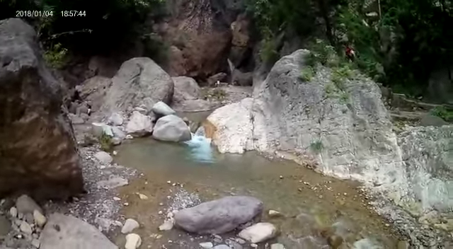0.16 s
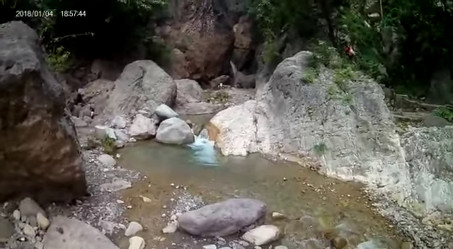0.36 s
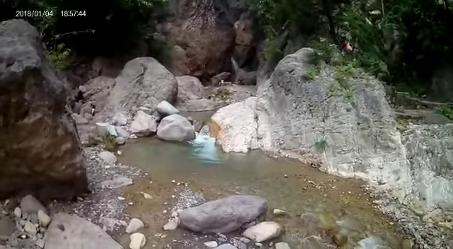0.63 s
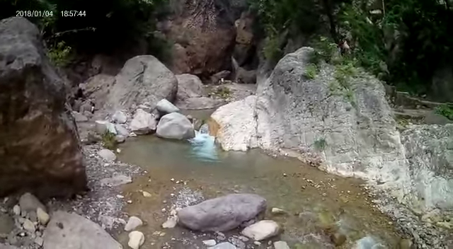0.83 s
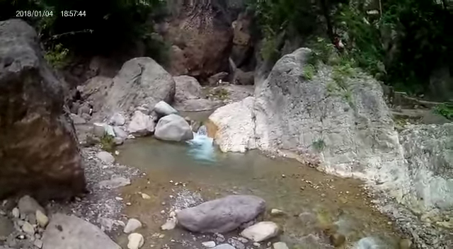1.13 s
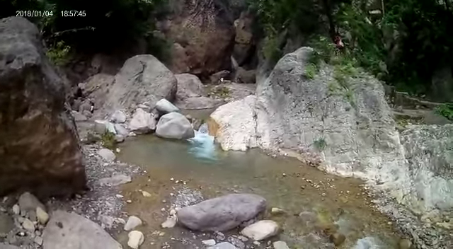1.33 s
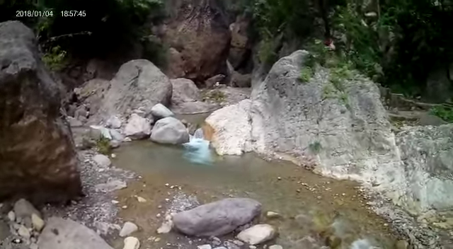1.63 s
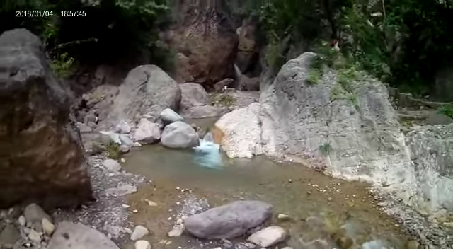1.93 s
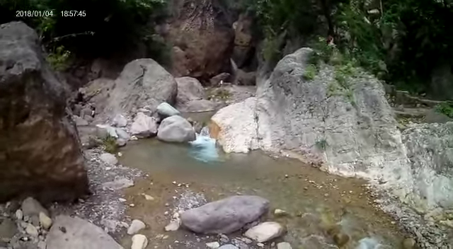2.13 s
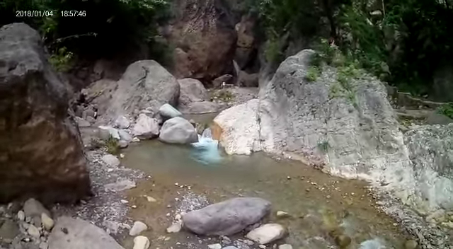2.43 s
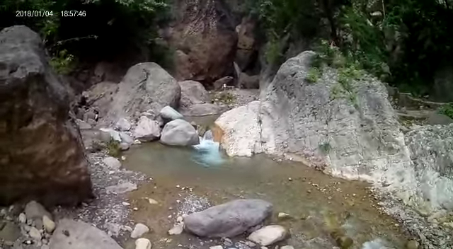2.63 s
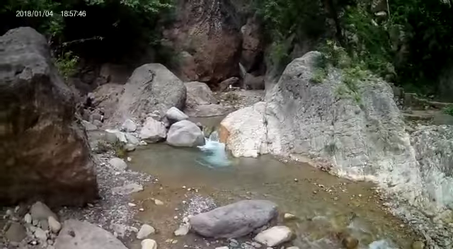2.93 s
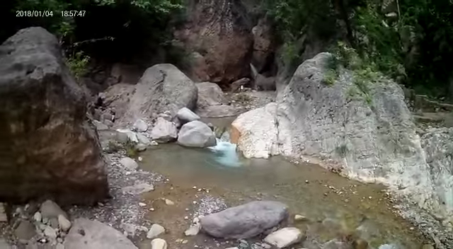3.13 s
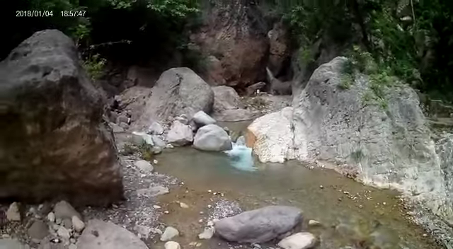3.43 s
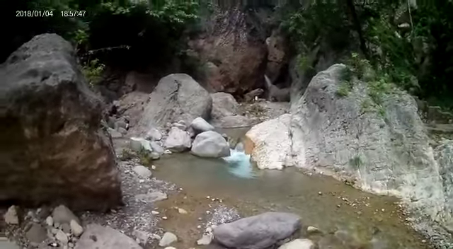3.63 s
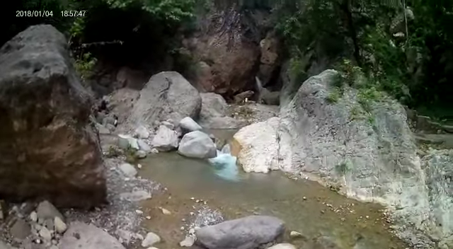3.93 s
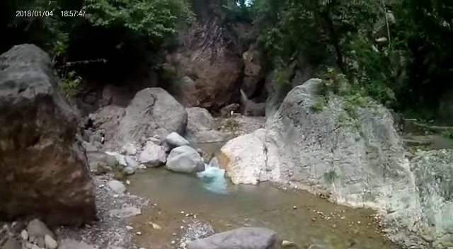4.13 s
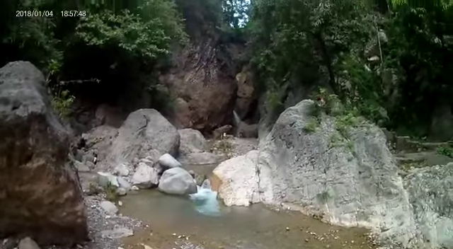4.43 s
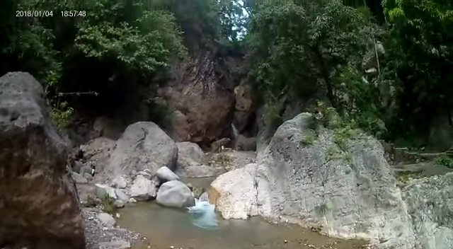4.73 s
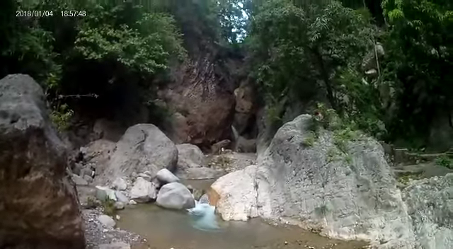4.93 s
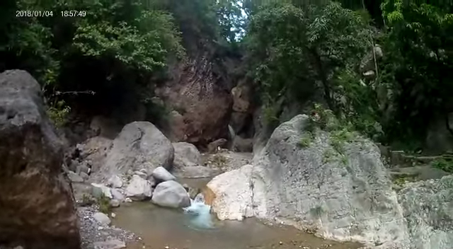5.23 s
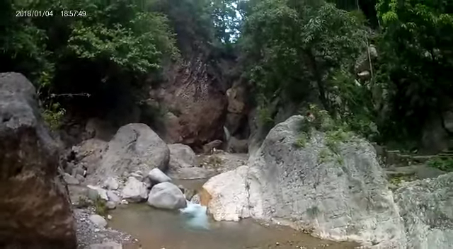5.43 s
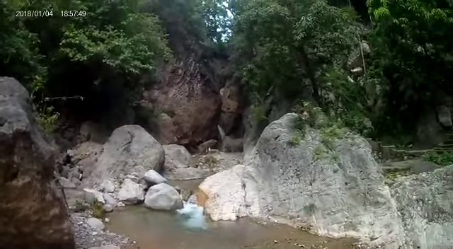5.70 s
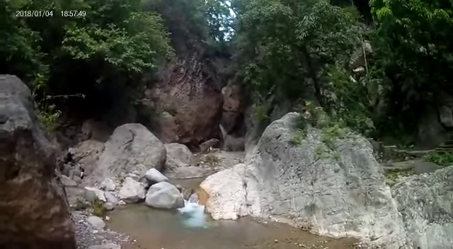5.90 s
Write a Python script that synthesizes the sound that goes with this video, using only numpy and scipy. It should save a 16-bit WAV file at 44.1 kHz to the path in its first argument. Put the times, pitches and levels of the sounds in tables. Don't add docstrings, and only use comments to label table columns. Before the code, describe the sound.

Muffled, steady stream rush with occasional bubble glugs; four very loud plastic snaps close to the microphone, three preceded by faint handling taps and clicks.

```python
import sys
import numpy as np
from scipy import signal
from scipy.fft import rfft, irfft, next_fast_len
from scipy.io import wavfile
from scipy.ndimage import uniform_filter1d, map_coordinates

SR = 44100
rng = np.random.default_rng(int(sys.argv[2]) if len(sys.argv) > 2 else 0)


def volts_from_decibels(level):
    exponent = np.asarray(level, float) / 20
    return 10 ** exponent


def output_pcm(signal):
    pcm = np.clip(np.atleast_2d(signal).T, -1, 1) * 32767
    wavfile.write(sys.argv[1], SR, np.round(pcm).astype(np.int16))


N = 267187


def unit(x):
    return x / np.sqrt(np.mean(x ** 2) + 1e-20)


def along(points, hz):
    f, v = np.transpose(points)
    return np.interp(np.log(hz + 1), np.log(f + 1), v)


def filtered(x, response):
    m = next_fast_len(N + 8192)
    return irfft(rfft(x, m) * response(np.fft.rfftfreq(m, 1 / SR)), m)[:N]


def shaped_noise(x, spectrum):
    return unit(filtered(x, lambda f: volts_from_decibels(along(spectrum, f))))


def wobble(rate):
    return map_coordinates(rng.standard_normal(N // 1000 + 4), [np.arange(N) * rate / SR])


def blurred(shape, bins, frames):
    field = uniform_filter1d(rng.standard_normal(shape), size=bins, axis=0)
    return unit(uniform_filter1d(field, size=frames, axis=1))


def patchy(depth_db):
    z = signal.stft(rng.standard_normal(N + 512), nperseg=512)[2]
    gain = volts_from_decibels(depth_db * blurred(z.shape, bins=5, frames=8))
    return signal.istft(z * gain, nperseg=512)[1][:N]


def add(track, s, sound):
    part = track[max(round(s * SR), 0):][:len(sound)]
    part += sound[:len(part)]


def bubble(t, hz, cycles):
    life = t * hz / cycles
    tone = np.sin(2 * np.pi * hz * t * (1 + .06 * life))
    return tone * np.exp(-life) * (1 - np.exp(-6 * life))


def froth(count, hz, cycles, spread_db):
    when, pitch, size = rng.random(count), rng.standard_normal(count), rng.exponential(size=count)
    step = np.arange(500)
    pitches = hz * np.exp(.6 * pitch)[:, None]
    grains = volts_from_decibels(spread_db * size)[:, None] * bubble(step / SR, pitches, cycles)
    places = (when * N).astype(int)[:, None] + step
    return unit(np.bincount(places.ravel(), grains.ravel())[:N])


def ring(modes, t, contact):
    on = np.maximum(t, 0)
    tones = 0
    for hz, db, t60 in modes:
        decay = volts_from_decibels(db + rng.normal(0, 1) - 60 * on / t60)
        tones = tones + decay * np.sin(2 * np.pi * hz * on)
    return tones * (1 - np.exp(-on / contact))


def contacts(rows, air, parts):
    sign, hz, lag, rise, fall, jerk_db, width, contact = air
    lead = .02
    out, t = np.zeros(N), np.arange(SR // 6) / SR - lead
    late = t - lag
    swell = np.where(late < 0, np.exp(-(late / rise) ** 2), np.exp(-late / fall))
    slowing = late / (1 + 30 * np.abs(late))
    jerk = volts_from_decibels(jerk_db) * np.exp(-(t / width) ** 2)
    squeeze = swell * np.cos(2 * np.pi * hz * slowing) - jerk
    for s, air_db, *part_db in rows:
        shake = sum(volts_from_decibels(db) * ring(part, t, contact) for db, part in zip(part_db, parts))
        add(out, s - lead, sign * (volts_from_decibels(air_db) * squeeze - shake))
    return out


def levels(rows, follow):
    s, hard_db, lean_db = np.transpose(rows)
    air, lid, chink = [db + gain * (hard_db - hard_db.mean()) for db, gain in follow]
    chink = chink + .6 * lean_db
    return np.transpose([s, air, lid, hard_db - lean_db, hard_db + lean_db, chink])


# (frequency [Hz], density [dB per Hz])
ROAR_SPECTRUM = [(70, -40), (120, -11), (162, -13), (214, -7.5), (560, -6.5), (780, -8), (1110, -3),
                 (1240, -4), (1430, .8), (1750, -4), (2100, -12.5), (2550, -22), (3200, -42), (6000, -120)]
# (frequency [Hz], density [dB per Hz])
SPRAY_SPECTRUM = [(2000, -30), (2750, -12), (3050, -6), (3520, -8), (4130, 1.5), (4330, -4), (4500, -3),
                  (4750, -11), (5350, -15), (6050, -18), (6270, -25), (6500, -19), (7150, -19), (8000, -46)]
# (frequency [Hz], width [Hz], depth [0-1])
SHELL_NOTCH = (1225, 45, .55)
ROAR_DB, SPRAY_DB = -48.9, -60.7


def waterfall():
    hz, width, depth = SHELL_NOTCH

    def through(f):
        notch = 1 - depth / (1 + ((f - hz) / width) ** 4)
        return volts_from_decibels(along(ROAR_SPECTRUM, f)) * notch

    bubbles = froth(count=3500, hz=1100, cycles=3, spread_db=1.6)
    roar = unit(filtered(unit(patchy(depth_db=.7)) + .22 * bubbles, through))
    spray = shaped_noise(patchy(depth_db=.9), SPRAY_SPECTRUM)
    surge = wobble(3)
    roar_gain = volts_from_decibels(ROAR_DB + .5 * surge + .6 * wobble(14))
    return roar_gain * roar + volts_from_decibels(SPRAY_DB + .3 * surge) * spray


def effort():
    reach_s, ease_s = .1, .4
    t = np.arange(N) / SR
    starts = [-ease_s] + [row[0] - reach_s for row in PRESS_TIMES]
    held = sum((t > a) & (t < row[0]) for a, row in zip(starts, SNAP_TIMES))
    return uniform_filter1d(held * 1., size=round(ease_s * SR))


# (frequency [Hz], density [dB per Hz])
GRIP_SPECTRUM = [(8, -20), (15, 0), (43, -2), (70, 0), (135, -7), (220, -18), (400, -120)]
GRIP_DB, SQUEEZE_DB = -62.5, 8


def hand_rumble():
    noise = shaped_noise(rng.standard_normal(N), GRIP_SPECTRUM)
    grip = unit(volts_from_decibels(3 * wobble(9)) * noise)
    return volts_from_decibels(GRIP_DB + SQUEEZE_DB * effort()) * grip


# (time [s], hardness [dB], lean from shell toward tick [dB])
SNAP_TIMES = [
    (.0268, 5.2, 1),
    (2.0612, -2.7, 4.2),
    (4.1378, 4, -3),
    (5.7112, 4, 4),
]
# (sign, frequency [Hz], peak after contact [s], rise [s], fall [s],
# jerk [dB], jerk width [s], contact time [s])
SNAP_THUMP = (1, 90, .002, .0018, .006, 1.5, .0012, .001)
# (level at usual hardness [dB], gain per dB of hardness [dB])
SNAP_COUPLING = [(-8, .02), (-3.4, .15), (-3.5, .25)]
# (frequency [Hz], level [dB], t60 [s])
LID_MODES = [(650, 0, .025), (800, -1.5, .017)]
# (frequency [Hz], level [dB], t60 [s])
SHELL_MODES = [(1370, 0, .016), (1600, 0, .012)]
# (frequency [Hz], level [dB], t60 [s])
TICK_MODES = [(2130, 4, .012), (2620, -1, .010)]
# (frequency [Hz], level [dB], t60 [s])
DOOR_MODES = [(1130, -8, .026), (1077, -38, .15)]
# (frequency [Hz], level [dB], t60 [s])
PIN_MODES = [(3545, -25, .03), (3528, -44, .12)]
# (frequency [Hz], level [dB], t60 [s])
CHINK_MODES = [(3530, -8, .008), (4080, 1, .009), (4550, -3, .008), (5420, -5, .008)]
# (frequency [Hz], level [dB], t60 [s])
GLINT_MODES = [(6280, -8, .008), (9500, -27, .004), (13000, -28, .004)]


def snaps():
    parts = (LID_MODES, SHELL_MODES, TICK_MODES + DOOR_MODES + PIN_MODES, CHINK_MODES + GLINT_MODES)
    return contacts(levels(SNAP_TIMES, SNAP_COUPLING), SNAP_THUMP, parts)


# (time [s], air [dB], lid [dB], shell [dB], tick [dB])
TOUCH_TIMES = [
    (.1905, -47, -42, -38, -31),
    (1.107, -40, -52, -60, -60),
    (1.486, -38, -60, -60, -60),
    (1.627, -50, -50, -42, -40),
    (3.687, -32, -40, -50, -60),
    (3.8683, -56, -37, -35, -41),
    (3.897, -58, -56, -48, -47),
    (5.313, -52, -34, -52, -60),
]
# (sign, frequency [Hz], peak after contact [s], rise [s], fall [s],
# jerk [dB], jerk width [s], contact time [s])
PRESS_THUMP = (-1, 72, .0025, .005, .011, -20, .0003, .00025)
# (frequency [Hz], level [dB], t60 [s])
FINGER_MODES = [(330, -4, .014), (650, -1, .02), (820, -3, .015)]
# (frequency [Hz], level [dB], t60 [s])
PAD_TICK_MODES = [(2250, 7, .007)]


def touches():
    return contacts(TOUCH_TIMES, PRESS_THUMP, (FINGER_MODES, SHELL_MODES, PAD_TICK_MODES))


# (time [s], peak level [dB], frequency [Hz])
GLUG_TIMES = [
    (.83, -47, 700),
    (1.779, -35, 1490),
    (3.037, -38, 1020),
    (3.122, -45, 650),
    (3.366, -43, 622),
    (4.892, -44, 1100),
]


def glugs():
    out, t = np.zeros(N), np.arange(SR // 10) / SR
    for s, db, hz in GLUG_TIMES:
        add(out, s, volts_from_decibels(db + 1.5) * bubble(t, hz, cycles=9))
    return out


# (time [s], hardness [dB], lean from shell toward tick [dB])
PRESS_TIMES = [
    (1.6334, -30.5, 5),
    (3.7465, -18.5, 3),
    (5.2597, -21, 4),
]
# (frequency [Hz], level [dB], t60 [s])
GRIT_MODES = [(8600, -34, .006), (9800, -33, .006), (11000, -32, .006), (12200, -33, .006),
              (13600, -33, .006)]


def scrapes():
    rows = [(row[0] - .006, -np.inf, -17) for row in PRESS_TIMES]
    return contacts(rows, PRESS_THUMP, (GRIT_MODES,))


# (level at usual hardness [dB], gain per dB of hardness [dB])
PRESS_COUPLING = [(-20.5, .82), (-31, 1.5), (-20.5, 1.95)]
# (frequency [Hz], level [dB], t60 [s])
PAD_CHINK_MODES = [(3980, 2.5, .006), (5420, -12, .007)]


def presses():
    parts = (FINGER_MODES, SHELL_MODES, PAD_TICK_MODES, PAD_CHINK_MODES)
    return contacts(levels(PRESS_TIMES, PRESS_COUPLING), PRESS_THUMP, parts)


# (time [s], hardness [dB], lean from shell toward tick [dB])
SEAT_TIMES = [
    (1.7311, -32, 1.5),
    (3.7851, -27, -4),
    (5.3315, -25, -.5),
]
# (sign, frequency [Hz], peak after contact [s], rise [s], fall [s],
# jerk [dB], jerk width [s], contact time [s])
SEAT_THUMP = (-1, 90, .0025, .0015, .007, .5, .0005, .0012)
# (level at usual hardness [dB], gain per dB of hardness [dB])
SEAT_COUPLING = [(-29.5, .47), (-14.5, -.4), (-32, .75)]
# (frequency [Hz], level [dB], t60 [s])
HELD_LID_MODES = [(640, -7, .022), (790, 0, .019)]


def seats():
    parts = (HELD_LID_MODES + GRIT_MODES, SHELL_MODES + DOOR_MODES, TICK_MODES, CHINK_MODES)
    return contacts(levels(SEAT_TIMES, SEAT_COUPLING), SEAT_THUMP, parts)


# (time [s], hardness [dB], lean from shell toward tick [dB])
UNSEAT_TIMES = [
    (1.9643, -33, -5),
    (4.0137, -46, .1),
    (5.5899, -52, .1),
]
# (sign, frequency [Hz], peak after contact [s], rise [s], fall [s],
# jerk [dB], jerk width [s], contact time [s])
UNSEAT_THUMP = (1, 90, .0025, .0015, .006, .5, .0007, .0022)
# (level at usual hardness [dB], gain per dB of hardness [dB])
UNSEAT_COUPLING = [(-24.3, .13), (-9, .42), (-55, .3)]
# (frequency [Hz], level [dB], t60 [s])
FREED_LID_MODES = [(650, -.5, .018), (750, -2.5, .017)]


def unseats():
    parts = (FREED_LID_MODES + GRIT_MODES, SHELL_MODES + DOOR_MODES, TICK_MODES, CHINK_MODES)
    return contacts(levels(UNSEAT_TIMES, UNSEAT_COUPLING), UNSEAT_THUMP, parts)


# (time [s], peak level [dB], t60 [s])
TWANG_TIMES = [
    (2.005, -39, .14),
    (4.068, -39, .14),
    (5.645, -40, .15),
]
SPRING_HZ = 312


def spring():
    out, t = np.zeros(N), np.arange(SR // 4) / SR
    for s, db, t60 in TWANG_TIMES:
        add(out, s, volts_from_decibels(db) * ring([(SPRING_HZ, 0, t60)], t, contact=.003))
    return out


def scene():
    water = waterfall() + glugs()
    button = snaps() + touches() + scrapes() + presses() + seats() + unseats() + spring()
    return (water + hand_rumble() + button)[None]


# (frequency [Hz], threshold re block level [dB])
DEAD_LINES = [(2000, -14), (5000, -8), (6000, 2.5), (8000, 3.5)]
# (frequency [Hz], share [0-1])
LINE_SHARE = [(4500, .95), (6000, .2), (8000, .09), (14500, .07)]
# (frequency [Hz], level [dB])
SHARP_LEVEL = [(5000, 0), (7000, 2.5), (8500, -6), (14500, -12), (15000, -90)]
# (frequency [Hz], level re block level [dB])
SMEAR_LEVEL = [(300, -34), (1000, -23), (2500, -18), (5000, -12), (6500, -7), (9000, -2), (14500, .5),
               (15000, -80)]
# (frequency [Hz], rarity [sigma])
BAND_GAPS = [(2500, 4), (5000, 2.2), (6200, 1.2), (7900, .6), (8600, 3)]
RICH_DB = -76
BUSY, BUSY_DB, WEAK_DB = 1.1, -58, -14


def smeared(x):
    block = 1882
    hz, _, z = signal.stft(x, SR, "cosine", nperseg=block)
    level = np.sqrt(np.abs(uniform_filter1d(np.abs(z) ** 2, size=40, axis=0)))
    uneven = unit(uniform_filter1d(rng.standard_normal(z.shape), size=12, axis=0))
    step_db = along(DEAD_LINES, hz)[:, None] + 3.5 * uneven
    kept = z * (np.abs(z) > volts_from_decibels(step_db) * np.minimum(level, volts_from_decibels(RICH_DB)))
    share = np.clip(along(LINE_SHARE, hz), .01, 1)[:, None]
    phase = np.exp(2j * np.pi * rng.random(z.shape))
    lines = (rng.random(z.shape) < share) / np.sqrt(share) * phase
    sharp = volts_from_decibels(along(SHARP_LEVEL, hz))[:, None] * kept
    spread = volts_from_decibels(along(SMEAR_LEVEL, hz))[:, None] * level * lines
    luck = blurred(z.shape, bins=10, frames=4)
    peak = level.max(axis=0)
    busy = (peak > volts_from_decibels(BUSY_DB)) & (level < volts_from_decibels(WEAK_DB) * peak) & (hz > 2100)[:, None]
    heard = luck < np.where(busy, BUSY, along(BAND_GAPS, hz)[:, None])
    return signal.istft((sharp + spread) * heard, SR, "cosine", nperseg=block)[1][:N]


# (frequency [Hz], density [dB per Hz])
HISS_SPECTRUM = [(7800, -30), (8350, 0), (11300, -2), (11900, -8), (14200, -8), (14500, -40), (16000, -120)]
HISS_DB, CEILING = -86, .94


def microphone(dry):
    hiss = volts_from_decibels(HISS_DB) * shaped_noise(rng.standard_normal(N), HISS_SPECTRUM)
    held = dry / (1 + np.abs(dry / CEILING) ** 12) ** (1 / 12)
    return held[0] + hiss


def band_limit(x):
    return signal.sosfilt(signal.butter(12, 14950, fs=SR, output="sos"), x)


def record(dry):
    mix = smeared(microphone(dry))[None]
    return band_limit(mix)


dry = scene()
out = record(dry)
output_pcm(out)
```